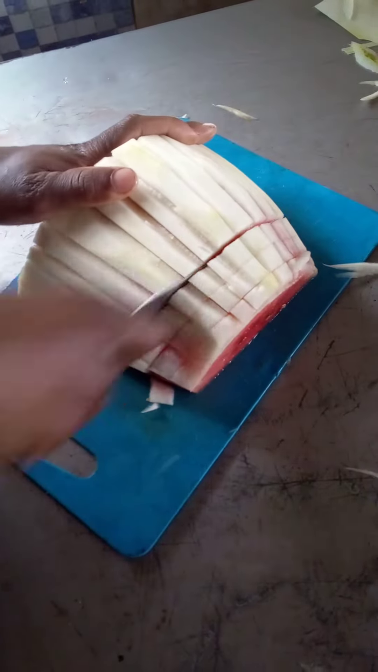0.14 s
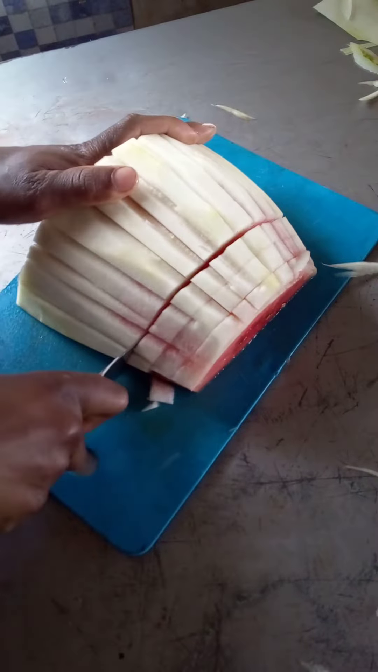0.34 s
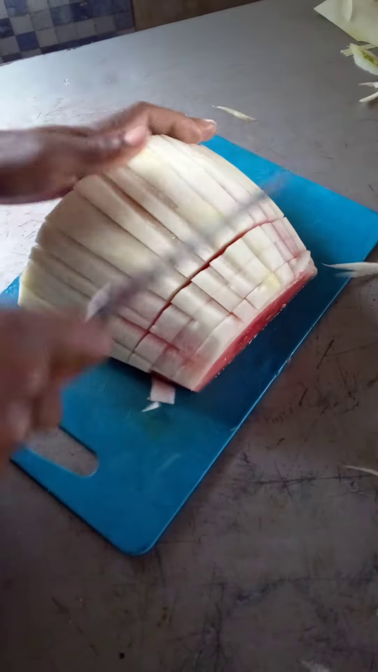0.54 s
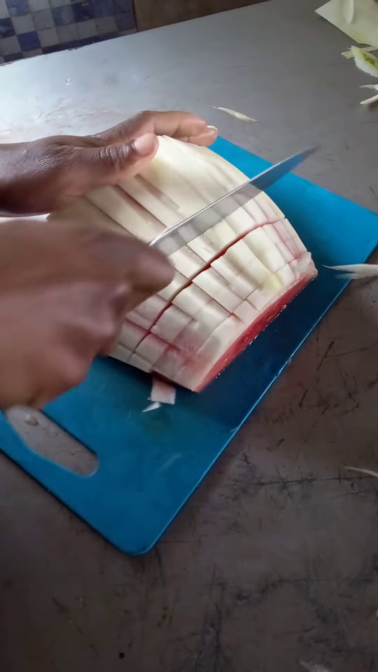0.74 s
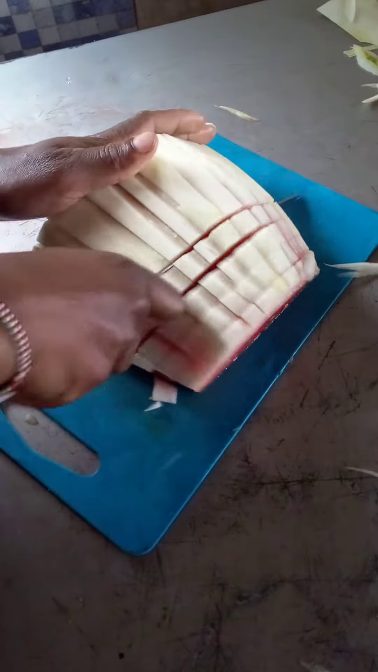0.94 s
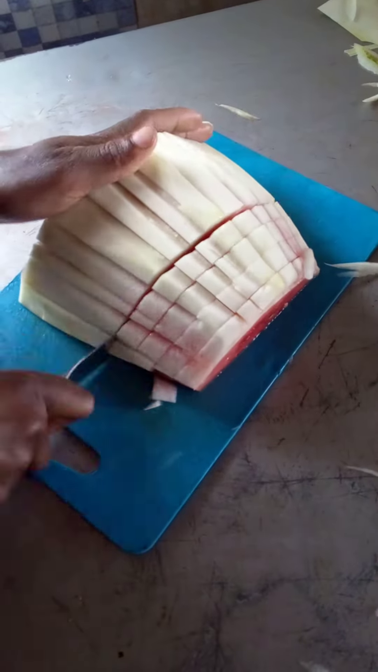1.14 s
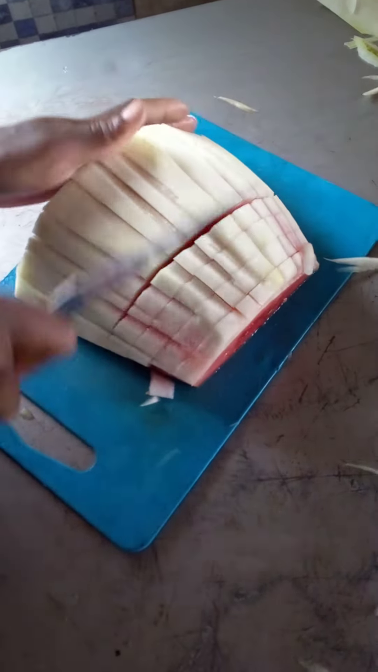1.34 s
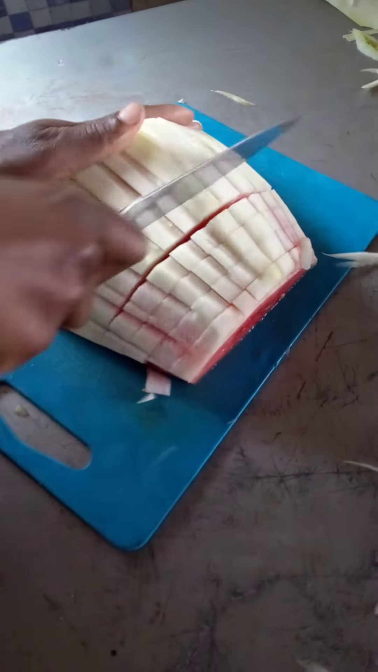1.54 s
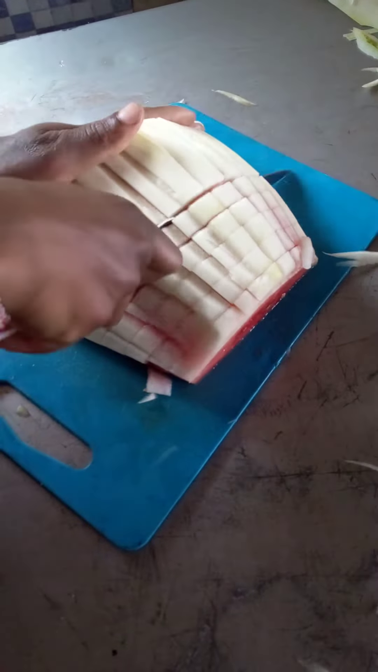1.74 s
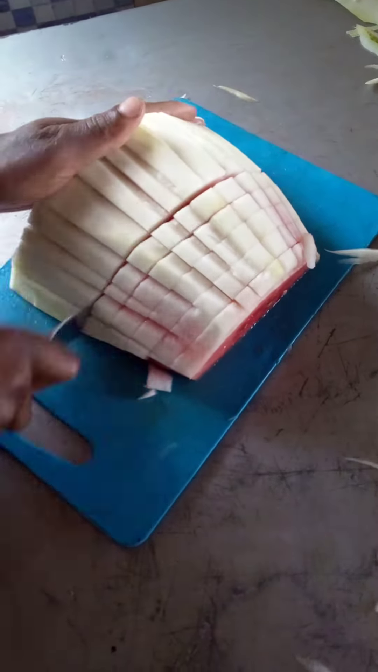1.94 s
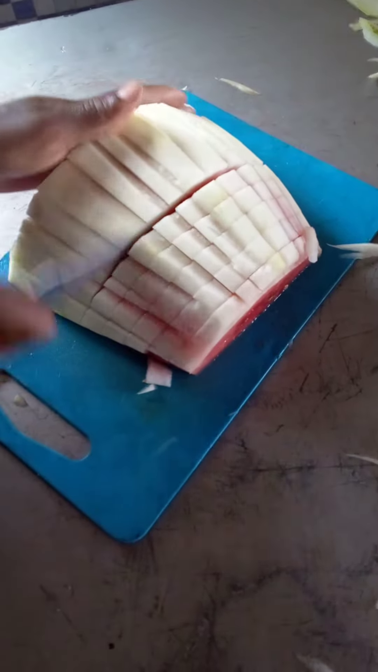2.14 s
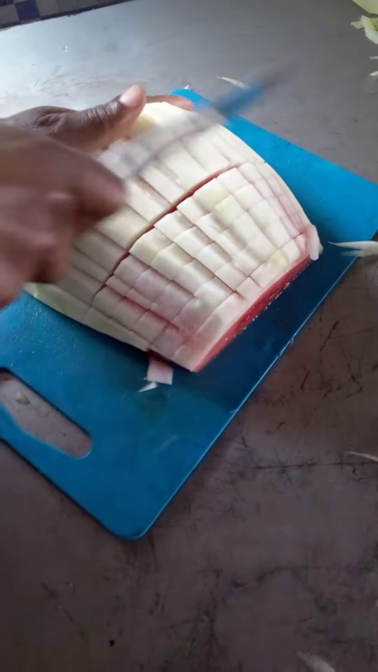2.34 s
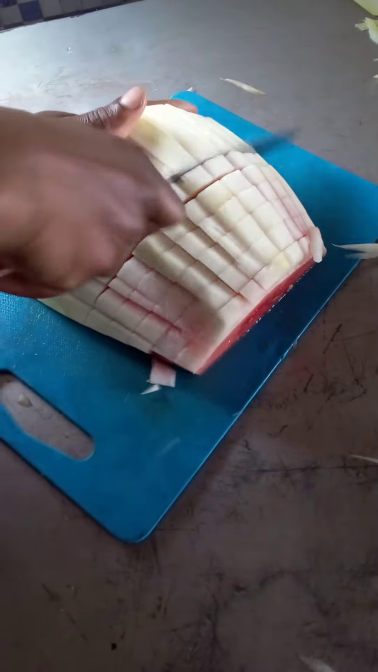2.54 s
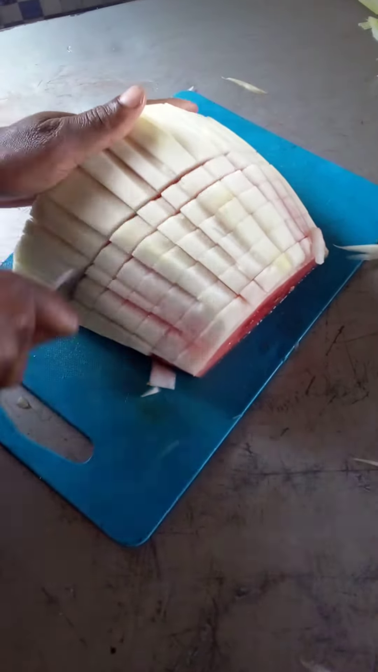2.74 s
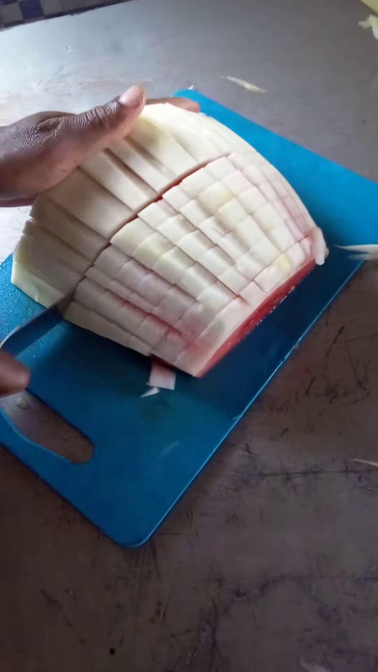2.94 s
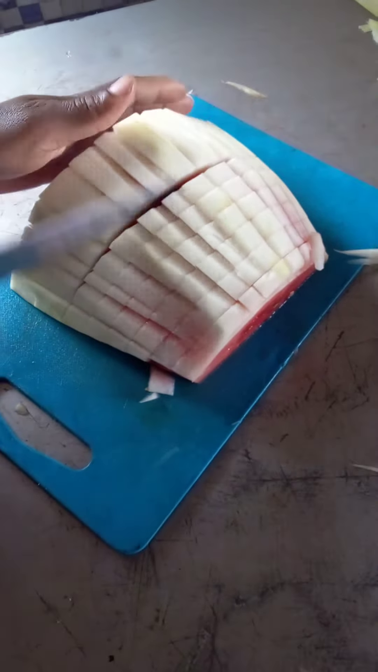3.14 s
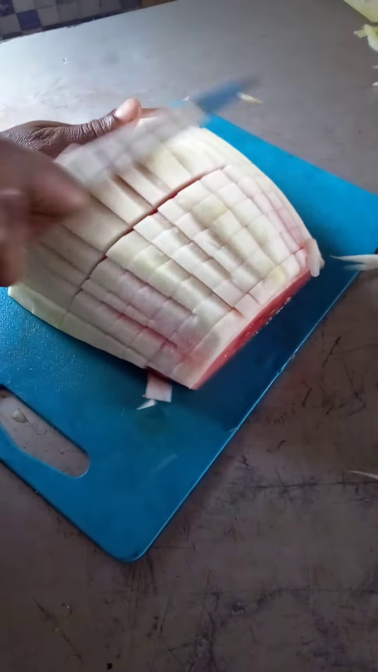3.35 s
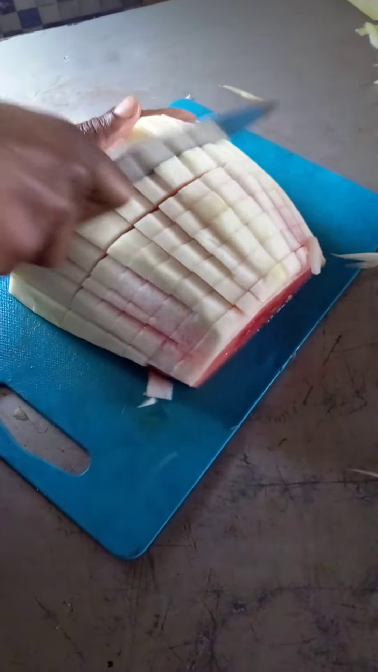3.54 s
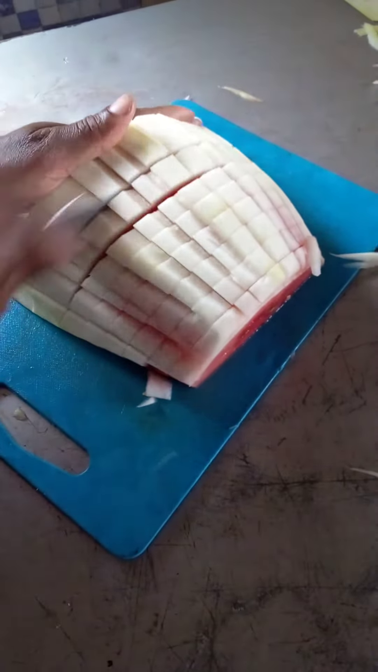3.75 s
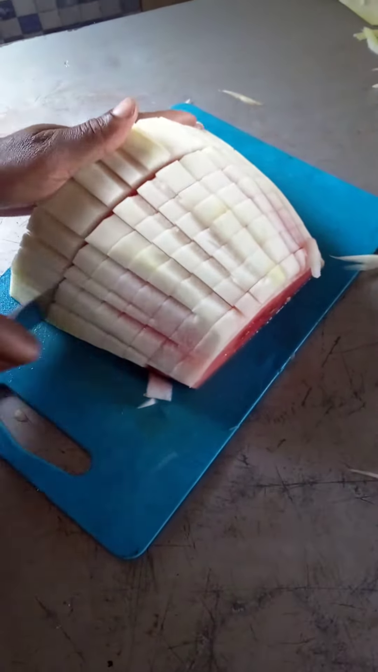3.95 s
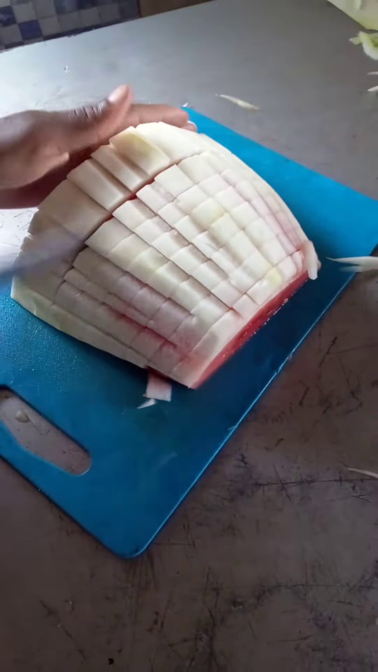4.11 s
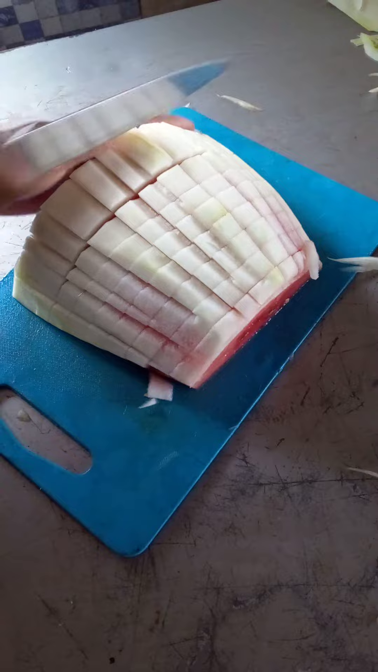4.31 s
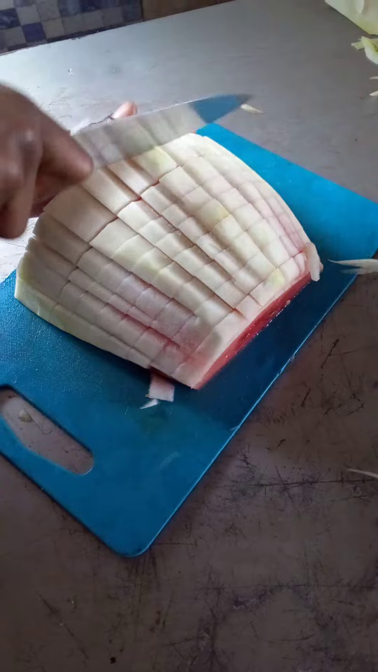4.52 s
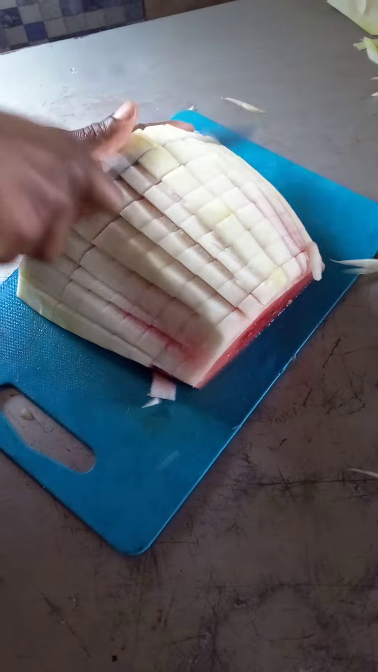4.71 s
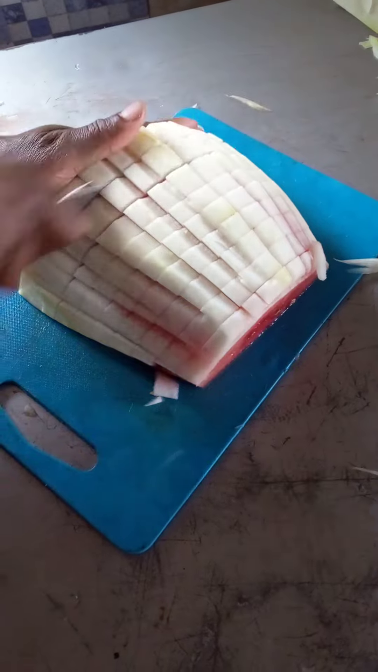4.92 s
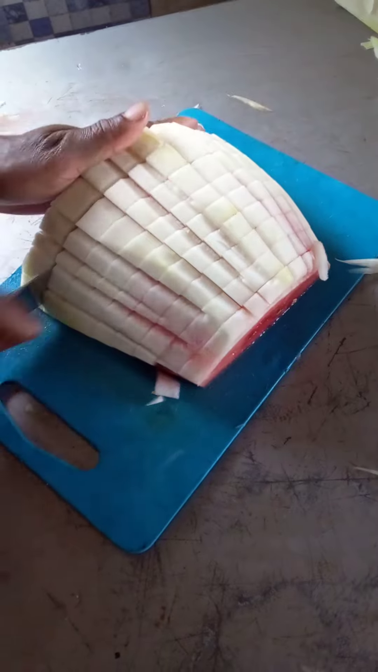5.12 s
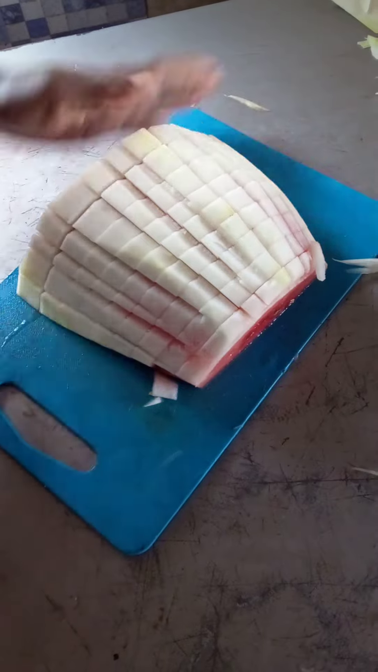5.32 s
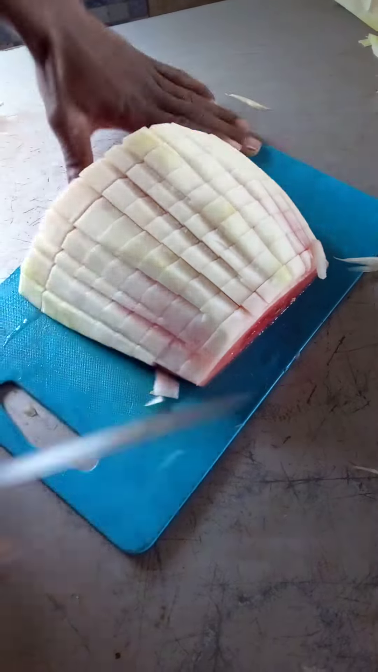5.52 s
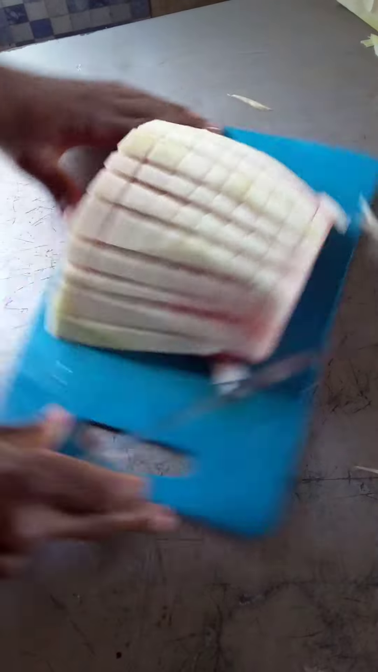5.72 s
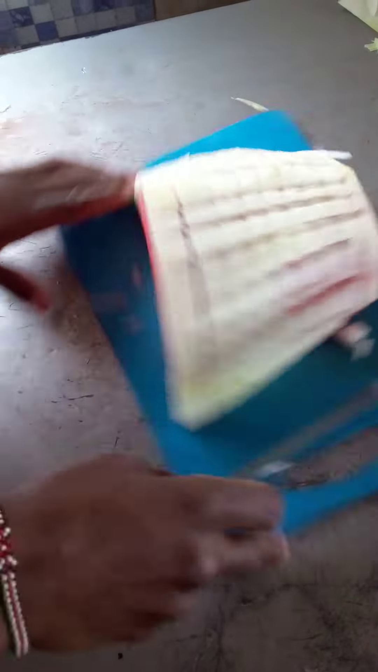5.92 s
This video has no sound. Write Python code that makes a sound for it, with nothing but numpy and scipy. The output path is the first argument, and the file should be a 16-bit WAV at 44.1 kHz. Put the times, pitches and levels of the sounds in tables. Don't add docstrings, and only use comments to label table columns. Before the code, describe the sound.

A knife cuts crisply through melon rind, knocking hard on a plastic board in uneven pairs, with wet rasps between blows in a small kitchen.

```python
import sys
import numpy as np
from scipy import signal
from scipy.fft import rfft, irfft
from scipy.io import wavfile
from scipy.ndimage import uniform_filter1d

SR = 44100
rng = np.random.default_rng(int(sys.argv[2]) if len(sys.argv) > 2 else 0)


def generate_wav(sig):
    pcm = np.round(np.clip(np.atleast_2d(sig).T, -1, 1) * 32767).astype(np.int16)
    wavfile.write(sys.argv[1], SR, pcm)


def volts_from_db(level):
    exponent = np.asarray(level, float) / 20
    return 10 ** exponent


N = 263277


def evened(x):
    return x / np.sqrt(np.mean(x ** 2) + 1e-20)


def peaked(x):
    return x / np.abs(x).max()


def read(points, hz):
    f, value = np.transpose(points)
    return np.interp(np.log(hz + 1), np.log(f + 1), value)


def add(mix, start_s, sound):
    part = mix[round(start_s * SR):][:len(sound)]
    part += sound[:len(part)]


def coloured(x, points):
    hz = np.fft.rfftfreq(len(x), 1 / SR)
    inside = (hz > points[0][0]) & (hz < points[-1][0])
    return evened(irfft(rfft(x) * volts_from_db(read(points, hz)) * inside, len(x)))


def ring(modes, detune, rise_s):
    t = np.arange(6000) / SR
    tones = np.zeros(6000)
    for k, (hz, db, t60_s) in enumerate(modes):
        tones += (-1) ** k * volts_from_db(db - 60 * t / t60_s) * np.sin(2 * np.pi * hz * detune[k] * t)
    return tones * (1 - np.exp(-t / rise_s))


def push(hz, turns):
    u = np.arange(6000) / SR * hz - 0.75
    width = np.where(u < 0, 0.55, turns)
    return np.cos(2 * np.pi * u) * np.exp(-(u / width) ** 2)


def strokes(rows, rest_db, part_db):
    stroke_db = 20
    t = np.arange(0, N / SR + 0.01, 0.001)
    power = volts_from_db(2 * rest_db) * np.ones(len(t))
    for (peak_s, rise_s, fall_s, db, *_), part in zip(rows, part_db * np.ones(len(rows))):
        away = np.maximum((peak_s - t) / rise_s, (t - peak_s) / fall_s)
        power += volts_from_db(2 * (db + part - stroke_db * away))
    return np.interp(np.arange(N) / SR, t, np.sqrt(power))


# (frequency [Hz], level [dB])
DRONE_SPECTRUM = [(100, -72), (150, -7.5), (250, 1), (400, -3.5), (700, -7), (1100, -12), (1600, -20),
                  (2500, -27.5)]
RUMBLE_SPECTRUM = [(20, -21), (40, -15), (62, -5), (85, -13), (115, -5.5), (150, -7.5), (220, -55)]
# (time [s], pitch [Hz], level [dB])
ENGINE_LINES = [
    [(0, 112.8, -47), (.6, 112, -46), (1.4, 110.8, -53.5), (2.3, 115.6, -47.5), (3.1, 108.1, -59),
     (3.35, 113.2, -41), (3.6, 115, -52.5), (4.1, 112.9, -44), (4.5, 120.2, -45), (5, 119.5, -42.5),
     (5.4, 115, -51), (5.97, 115.3, -44)],
    [(4.5, 65, -58), (5.1, 64.3, -55), (5.5, 64.7, -46), (5.97, 65.14, -44)],
    [(0, 250, -55), (.5, 254.7, -45), (1.5, 251, -54), (2.4, 250.3, -49.5), (3.2, 240.6, -54),
     (4.3, 248.3, -48), (5.3, 238.3, -56), (5.97, 239.7, -52)],
    [(5.4, 398, -57), (5.65, 397, -48.5), (5.85, 416, -40), (5.97, 416, -57)],
]
# (peak time [s], rise [s], fall [s], level [dB], boom re level [dB])
LEANS = [(.11, 0.3, 0.27, -35, -4), (.61, 0.89, 0.48, -41.5, -5), (0.972, 0.19, 0.25, -33.5, -14),
         (1.06, 0.21, 0.092, -36.5, 4.5), (1.3, .5, 0.11, -40, -6), (1.84, .2, 0.22, -33, -8.5),
         (2.56, 1, 1.3, -42.5, -4), (2.64, 0.1, 0.072, -47.5, 12), (3.6, 1, 1.2, -41, -18),
         (4.04, 0.13, 0.27, -49.5, 5.5), (4.47, 0.13, 0.15, -52, 10), (4.7, 0.68, 1.4, -41.5, -0.5),
         (5.12, 0.15, 0.23, -38, -24), (5.24, 0.22, 0.47, -46, 7.5), (5.49, 0.79, 0.87, -42, -2),
         (5.721, .4, 0.54, -48.5, 8.5), (5.97, 0.8, .5, -40.5, -2.5)]
DRONE_REST_DB, RUMBLE_REST_DB = -42.5, -53


def street():
    drone = strokes(LEANS, DRONE_REST_DB, np.transpose(LEANS)[-1])
    rumble = strokes(LEANS, RUMBLE_REST_DB, 0)
    t = np.arange(N) / SR
    noise = rng.standard_normal(N)
    out = drone * coloured(noise, DRONE_SPECTRUM) + rumble * coloured(noise, RUMBLE_SPECTRUM)
    for rows in ENGINE_LINES:
        s, hz, db = np.transpose(rows)
        waver_db = 3.94 * evened(uniform_filter1d(rng.standard_normal(N), 3000))
        fade = np.clip((t - s[0]) / 0.23, 0, 1)
        line = np.sqrt(2) * np.sin(2 * np.pi * np.cumsum(np.interp(t, s, hz)) / SR)
        out += fade * volts_from_db(np.interp(t, s, db) - 1.0 + waver_db) * line
    return out


# (delay [s], level [dB])
FLUTTER_ECHOES = [(.0036, -11), (.0092, -10), (.0176, -14), (.0258, -18), (.0345, -22)]
# (frequency [Hz], t60 [s])
KITCHEN_DECAY = [(150, 0.92), (400, 0.33), (1040, 0.3), (2000, 0.3), (3000, 0.079), (7280, 0.29),
                 (14000, 0.61)]
# (frequency [Hz], level [dB])
WALL_SPECTRUM = [(100, -14), (400, -10), (800, -2), (1500, 0), (2600, -6), (5000, -12), (9000, -24),
                 (16000, -30)]


def kitchen(x, tail_db):
    out = x.copy()
    dull = signal.sosfilt(signal.butter(1, 2000, fs=SR, output="sos"), x)
    for delay_s, db in FLUTTER_ECHOES:
        add(out, delay_s, volts_from_db(db) * dull)
    for k in range(3):
        taps = np.zeros(SR // 2)
        at = np.arange(200, SR // 2 - 20, 20)
        taps[at + rng.integers(0, 20, len(at))] = rng.choice([-1., 1.], len(at))
        hz, t, z = signal.stft(taps, SR, nperseg=256)
        tail_shape_db = read(WALL_SPECTRUM, hz)[:, None] - 60 * t / read(KITCHEN_DECAY, hz)[:, None]
        tail = signal.istft(z * volts_from_db(tail_shape_db), SR, nperseg=256)[1]
        share = np.sqrt(2 / 3) * np.cos(np.pi * (np.arange(N) / SR * 0.7 + k / 3))
        out += volts_from_db(tail_db) * signal.fftconvolve(x * share, tail / np.linalg.norm(tail))[:N]
    return out


# (time [s], peak level [dB], pitch [Hz])
THUDS = [(0.057, -29, 70.0), (0.376, -25.5, 62.5), (0.823, -16.5, 90), (0.936, -22, 114), (1.646, -16, 103),
         (2.484, -16.5, 104), (3.48, -23, 114), (3.663, -21.5, 172.3), (3.683, -21, 163),
         (4.779, -22.5, 170)]


def thuds():
    out = np.zeros(N)
    for s, db, hz in THUDS:
        hum = ring([(hz, -12, 0.15)], [1], rise_s=0.013)
        add(out, s, volts_from_db(db - 4.0) * (push(hz, turns=2.0) + hum))
    return out


def grit(per_s, spread_db, wash):
    clicks = volts_from_db(spread_db * np.minimum(rng.exponential(1, N), 5)) * (rng.random(N) < per_s / SR)
    clicks *= rng.choice([-1., 1.], N)
    flicker = evened(uniform_filter1d(rng.standard_normal(N), 500))
    return (evened(clicks) + wash * rng.standard_normal(N)) * volts_from_db(1.37 * flicker)


# (frequency [Hz], level [dB])
RASP_SPECTRUM = [(700, -70), (1400, -1), (2200, 1), (2800, 0.5), (3400, -0.5), (4000, -9), (5000, -50)]
HISS_SPECTRUM = [(3400, -9), (4300, -2), (5300, 2), (6000, -7), (6700, -19.5), (7700, -18.5), (8800, -17.5)]
FIZZ_SPECTRUM = [(7000, -76), (8600, -9), (10200, -3.5), (12500, 1.5), (14200, 1), (15600, -4.5),
                 (16000, -34)]
# (peak time [s], rise [s], fall [s], level [dB])
SLICES = [(.05, 0.025, 0.22, -41.5), (.12, 0.13, 0.098, -43.5), (.329, 0.056, 0.076, -43.5),
          (.963, 0.057, .16, -40), (1.2, 0.033, .07, -42.5), (1.422, 0.019, 0.018, -53),
          (1.57, 0.024, 0.27, -55), (2.28, 0.084, 0.087, -56.5), (1.801, 0.074, 0.11, -39.5),
          (2.02, .09, 0.13, -42), (2.625, .09, 0.074, -41), (2.79, 0.13, .1, -48),
          (2.86, 0.11, 0.054, -46.5), (3.038, .04, 0.051, -43), (3.188, 0.15, .1, -49),
          (3.652, 0.037, 0.24, -46), (3.702, 0.13, 0.06, -43), (3.891, 0.073, .16, -44),
          (4.111, .15, 0.1, -52), (4.345, 0.21, 0.22, -56.5), (4.7, .04, .3, -49), (4.784, 0.13, 0.15, -42),
          (4.874, .2, 0.083, -45.5), (5.068, 0.062, 0.16, -43), (5.26, 0.074, .2, -48),
          (5.343, 0.2, .06, -38), (5.617, .1, .5, -53.5), (5.847, .07, .06, -43.5),
          (5.941, 0.052, 0.1, -43)]
# (peak time [s], rise [s], fall [s], level [dB], blade hiss re level [dB])
DRAGS = [(.05, 0.04, .2, -41, -6), (.13, .1, 0.27, -44, -1), (.758, 0.18, .25, -53, 2),
         (.963, 0.043, 0.11, -39.5, 0), (1.02, 0.071, .15, -47, 9.5), (1.093, 0.08, 0.089, -36.5, -14),
         (1.217, 0.034, 0.1, -39.5, -14), (1.62, 0.13, .15, -67, 0), (1.87, 0.11, 0.18, -41.5, -5.5),
         (2.08, 0.11, 0.44, -49, -4.5), (2.652, 0.2, 0.077, -45.5, -2), (2.809, 0.067, 0.1, -53, 9.5),
         (2.863, 0.06, 0.054, -39, -11), (3.507, 0.22, .1, -64, 5), (3.702, 0.11, 0.1, -45.5, -3),
         (3.94, 0.11, 0.18, -58.5, 17), (4.08, 0.14, 0.21, -46.5, -17), (4.345, 0.056, .5, -52.5, -1),
         (4.79, 0.17, 0.14, -50, -5.5), (5.118, 0.05, 0.14, -43.5, -2), (5.343, 0.14, 0.085, -40, 0),
         (5.65, 0.16, 0.81, -53.5, 1.5), (5.87, 0.13, 0.19, -45.5, 0), (5.97, .1, .1, -50, -12)]
REST_RASP_DB, REST_HISS_DB, REST_FIZZ_DB = -57.5, -61, -63.5
SLICE_RASP_DB, SLICE_HISS_DB, DRAG_FIZZ_DB = -4.5, -2, -26


def slide():
    both, wet, dry = SLICES + DRAGS, np.ones(len(SLICES)), np.ones(len(DRAGS))
    rasp = strokes(both, REST_RASP_DB, np.r_[SLICE_RASP_DB * wet, 0 * dry])
    hiss = strokes(both, REST_HISS_DB, np.r_[SLICE_HISS_DB * wet, np.transpose(DRAGS)[-1]])
    fizz = strokes(both, REST_FIZZ_DB, np.r_[0 * wet, DRAG_FIZZ_DB * dry])
    tearing = grit(per_s=2500, spread_db=3.4, wash=1.6)
    juice = grit(per_s=4900, spread_db=1.5, wash=2.2)
    out = rasp * coloured(tearing, RASP_SPECTRUM) + hiss * coloured(tearing, HISS_SPECTRUM)
    return out + fizz * coloured(juice, FIZZ_SPECTRUM)


# (time [s], pitch [Hz], length [s], level [dB])
SQUEAKS = [(4.81, 3300, 0.0094, -41), (5.262, 3350, .03, -41), (5.266, 5550, 0.033, -42),
           (5.29, 2210, 0.031, -34), (5.292, 4200, 0.018, -37.5), (5.305, 5900, 0.017, -40),
           (5.317, 3100, 0.039, -37.5), (5.326, 5220, 0.041, -35)]


def squeak():
    out = np.zeros(N)
    for (s, hz, length_s, db), noise in zip(SQUEAKS, rng.standard_normal((len(SQUEAKS), 4096))):
        resonance = signal.iirpeak(hz, hz / 120, SR)
        whistle = evened(signal.lfilter(*resonance, noise))[-round(length_s * SR):]
        add(out, s, volts_from_db(db) * whistle * np.hanning(len(whistle)))
    return out


# (time [s], peak level of the highs [dB], lower part re highs [dB])
SNAPS = [(0.8405, -39, -19), (1.5668, -35, -18), (2.4823, -41, 8.5), (2.5092, -43, -5), (2.8539, -34, -10),
         (3.0754, -37, -22), (3.9277, -30, -16), (4.1854, -62, 11), (4.4294, -64, 7), (5.113, -27, 0),
         (5.1936, -33, -22), (5.3374, -44.5, -6), (5.6057, -48, -4), (5.8198, -36, -14),
         (5.937, -28.5, -10)]


def snaps():
    out = np.zeros(N)
    fade = np.exp(-np.arange(1024) / SR / 0.0059)
    for (s, db, lower_db), noise in zip(SNAPS, rng.standard_normal((len(SNAPS), 1024))):
        high = peaked(coloured(noise, FIZZ_SPECTRUM) * fade)
        lower = peaked((coloured(noise, HISS_SPECTRUM) + coloured(noise, RASP_SPECTRUM)) * fade)
        add(out, s, volts_from_db(db) * (high + volts_from_db(lower_db) * lower))
    return out


# (time [s], edge crack [dB], board [dB], push [dB], tick [dB])
KNOCKS = [(0.1119, -7.5, -17.5, -12, -18), (0.3215, -27, -31.5, -10.5, -28), (0.3611, -50, -30.5, -22, -58),
          (0.3743, -35, -31.5, -22.5, -53), (1.0054, -6, -18.5, -14.5, -21.5),
          (1.2029, -20, -14, -8.5, -60), (1.8254, -25, -40, -29, -49), (1.8387, -7, -16.5, -12.5, -19),
          (2.0256, -19, -13, -9, -27.5), (2.8233, -20.5, -14.5, -6.5, -30), (3.033, -33, -35, -27, -35),
          (3.7097, -33, -32, -27, -46), (3.905, -12, -13, -6, -17), (3.9644, -13.5, -22.5, -20.5, -10.5),
          (4.8089, -31.5, -50, -38, -44), (4.8294, -33, -36.5, -28.5, -51),
          (5.0834, -18, -15.5, -10.5, -41)]
# (frequency [Hz], level [dB], t60 [s])
BOARD_MODES = [(519, 4, 0.017), (762, 13.5, 0.0075), (1286, 7.5, 0.01), (1677, 4.5, 0.008),
               (2144, -3.5, 0.011)]
EDGE_MODES = [(2260, -4.5, 0.013), (2600, -3, 0.015), (3130, 7.5, 0.0031), (4614, -4.5, 0.012),
              (5240, -2.5, 0.0071)]
HOLLOW_MODES = [(115, -35.5, 0.051), (213.2, -21.5, 0.25), (360, 4, 0.013), (481, -43, 0.24)]
# (frequency [Hz], level [dB])
CRUSH_SPECTRUM = [(400, -12), (800, -1), (1500, -2), (2500, -6), (4000, -10), (6000, -15), (7000, -35)]
TICK_SPECTRUM = [(5500, 18.5), (6500, -16), (8000, -14), (10000, 0), (12000, 4), (14500, -3), (16500, -28)]
PUSH_HZ, PUSH_HZ_PER_DB = 335.7, 2.77
EDGE_FIRST_HZ_PER_DB = 8.5
DETUNE = 0.015


def knocks():
    out = np.zeros(N)
    t = np.arange(6000) / SR
    detunes = rng.uniform(1 - DETUNE, 1 + DETUNE, (len(KNOCKS), 11))
    noises = rng.standard_normal((len(KNOCKS), 6000))
    for (s, edge_db, board_db, push_db, tick_db), detune, noise in zip(KNOCKS, detunes, noises):
        hz = PUSH_HZ + PUSH_HZ_PER_DB * push_db - EDGE_FIRST_HZ_PER_DB * max(edge_db - push_db, 0)
        low = push(hz, turns=0.54) + ring(HOLLOW_MODES, np.ones(4), rise_s=0.01)
        crush = coloured(noise, CRUSH_SPECTRUM) * (1 - np.exp(-t / 0.0006)) * np.exp(-t / 0.002)
        board = peaked(peaked(ring(BOARD_MODES, detune, rise_s=0.0008)) + 0.5 * peaked(crush))
        edge = peaked(ring(EDGE_MODES, detune[5:], rise_s=0.0004))
        tick = peaked(coloured(noise, TICK_SPECTRUM) * (1 - np.exp(-t / 0.0003)) * np.exp(-t / 0.001))
        blow = volts_from_db(edge_db) * edge + volts_from_db(board_db + 3.5) * board
        blow += volts_from_db(push_db) * low + volts_from_db(tick_db) * tick
        add(out, s, volts_from_db(5.0) * blow)
    return out


def scene():
    blows = knocks() + snaps()
    room = kitchen(blows, tail_db=-12)
    return (room + thuds() + slide() + squeak() + street())[None]


def band_limit(x):
    return signal.sosfilt(signal.butter(12, 16650, fs=SR, output="sos"), x)


def record(dry):
    thin = signal.sosfilt(signal.butter(2, 55, "high", fs=SR, output="sos"), dry)
    limited = thin / (1 + np.abs(thin) ** 6) ** (1 / 6)
    return band_limit(limited)


dry = scene()
out = record(dry)
generate_wav(out)
```